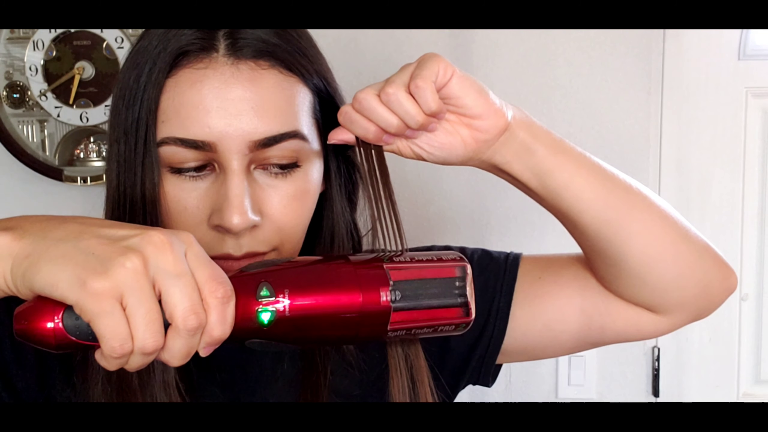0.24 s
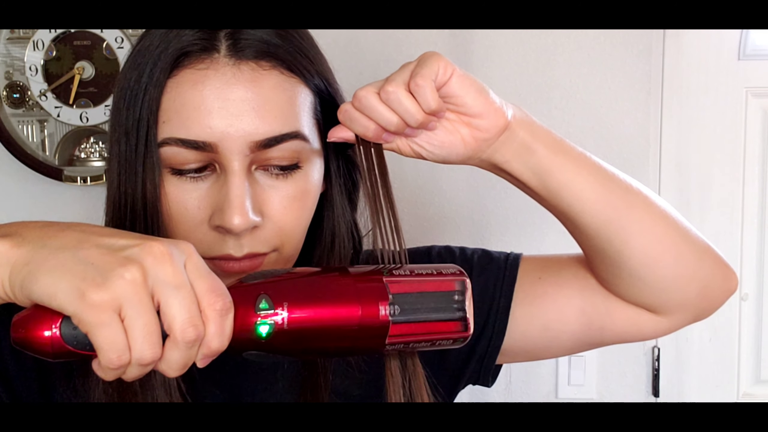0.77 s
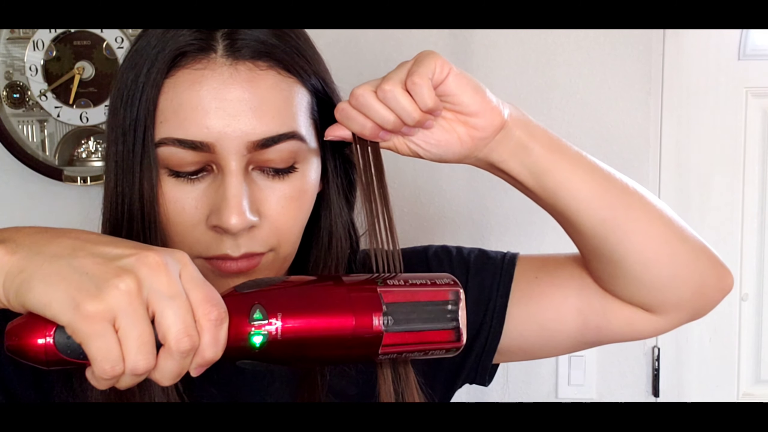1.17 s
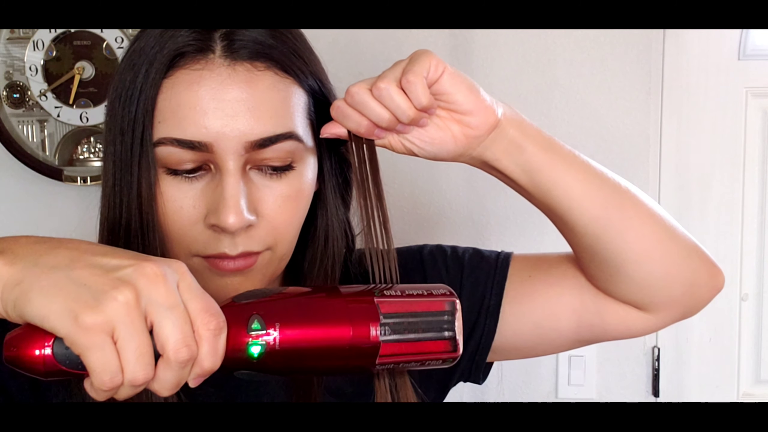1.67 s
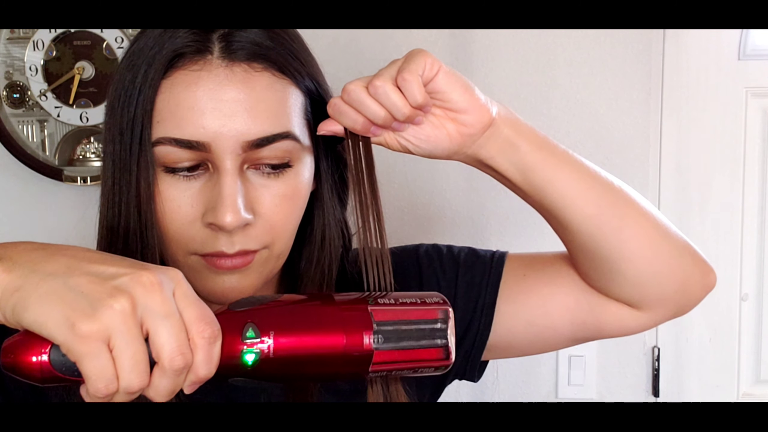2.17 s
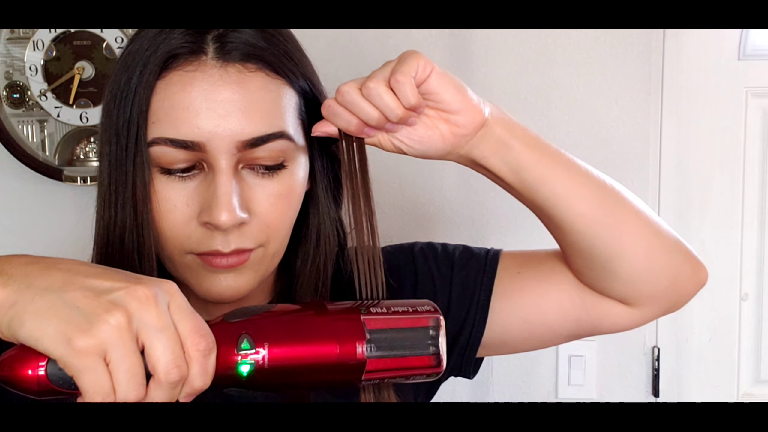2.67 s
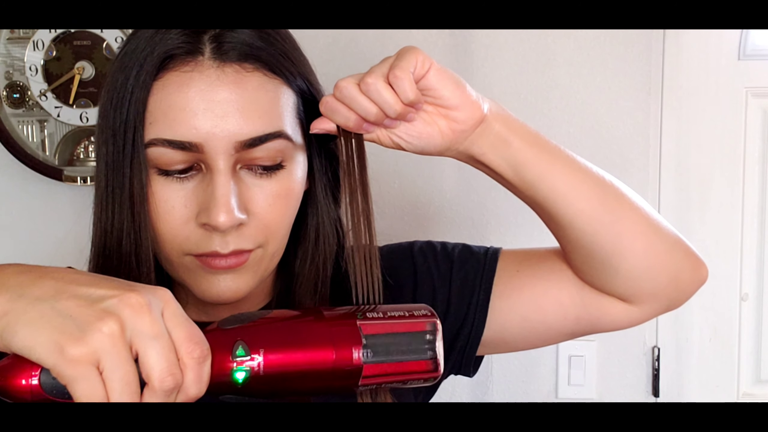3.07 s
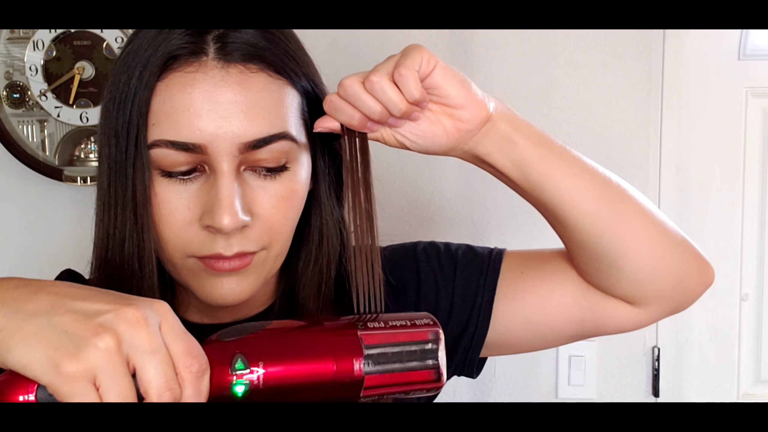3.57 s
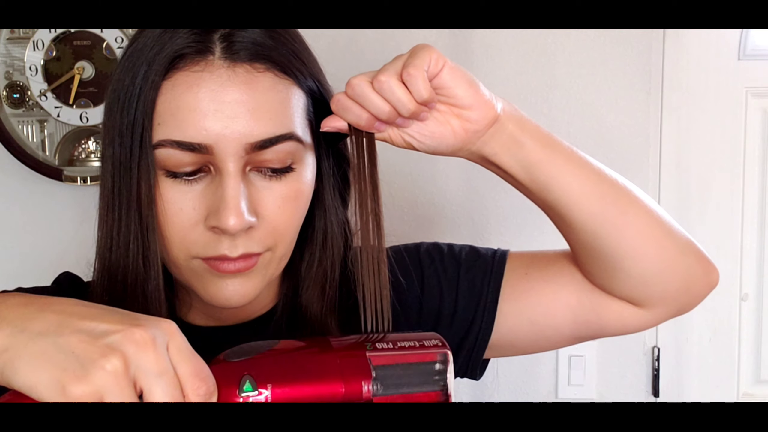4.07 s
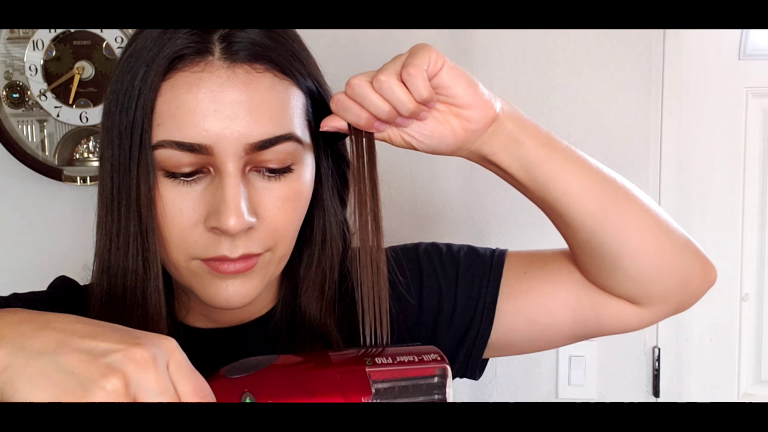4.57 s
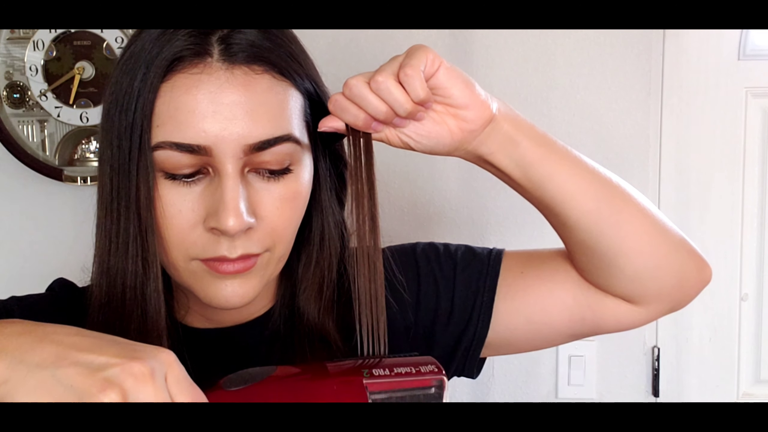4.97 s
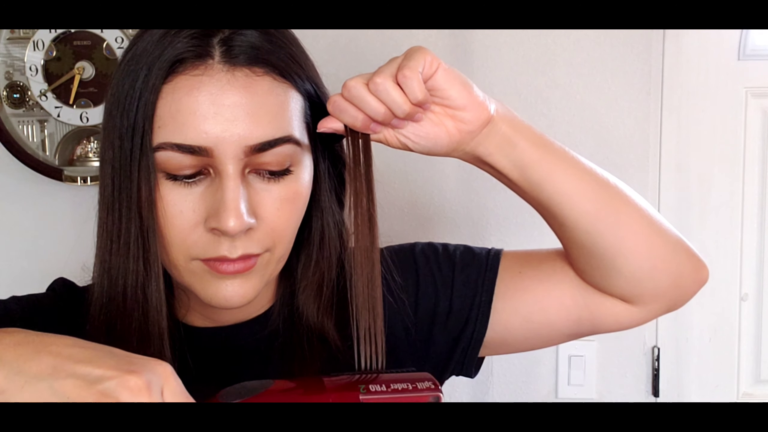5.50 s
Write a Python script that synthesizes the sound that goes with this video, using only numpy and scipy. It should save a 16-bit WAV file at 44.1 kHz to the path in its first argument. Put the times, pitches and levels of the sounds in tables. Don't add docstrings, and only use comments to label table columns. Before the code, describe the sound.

A handheld electric hair trimmer runs without a break, a buzzy, rattling whine with dry rubbing between rapid contacts. A tiny bright snip comes just after one second, then a cutter edge ticks more strongly within the buzz. The tone shifts as the tool is drawn down and turned. A cooling unit hums low underneath. Close stereo microphone, quiet small room with a short reverberation.

```python
import sys
import numpy as np
from scipy import signal
from scipy.fft import rfft, irfft, next_fast_len
from scipy.io import wavfile

SR = 44100
rng = np.random.default_rng(int(sys.argv[2]) if len(sys.argv) > 2 else 0)


def wav_out(sig):
    wavfile.write(sys.argv[1], SR, np.round(np.clip(np.atleast_2d(sig).T, -1, 1) * 32767).astype(np.int16))


def gain_from_db(level_db):
    decades = np.asarray(level_db, float) / 20
    return 10 ** decades


N = 253134
SIZE = next_fast_len(N + SR // 2)
HZ = np.arange(SIZE // 2 + 1) * SR / SIZE + 1e-3
SIDE = np.array([[.5], [-.5]])
MOTOR_TURNS_PER_DRUM_TURN = 3


def rms_one(x):
    return x / np.sqrt(np.mean(np.abs(x) ** 2) + 1e-20)


def in_time(rows):
    s, *columns = np.transpose(rows)
    return [np.interp(np.arange(N) / SR, s, c) for c in columns]


def pair(alike, length):
    mid, side = rfft(rng.standard_normal((2, length)), SIZE)
    alike = np.clip(alike, 0, 1)
    shared = np.sqrt(1 + alike) * mid
    different = np.sqrt(1 - alike) * side * [[1], [-1]]
    return (shared + different) / np.sqrt(2)


# (time [s], speed [turns/s])
MOTOR_SPEED = [(0.0, 67.40), (0.29, 67.36), (0.57, 67.442), (1.03, 67.099), (1.33, 67.329), (1.72, 67.009),
               (1.95, 67.04), (2.17, 66.963), (2.5, 67.336), (2.8, 67.132), (3.1, 67.243), (3.44, 67.402),
               (3.73, 67.241), (3.9, 67.269), (4.16, 67.198), (4.76, 67.429), (5.3, 67.329), (5.74, 67.15)]


def drum_turns():
    start = -.0102
    return start + np.cumsum(in_time(MOTOR_SPEED)[0]) / SR / MOTOR_TURNS_PER_DRUM_TURN


def blows(drum, places, db, jitter_s, uneven_db):
    turns = np.arange(-1, int(drum[-1]) + 1)
    places = (turns[:, None] + places).ravel()
    chance = rng.standard_normal((len(places), 2))
    samples = np.interp(places, drum, np.arange(N), -9, N + 9)
    at = np.round(samples + jitter_s * SR * chance[:, 0]).astype(int)
    inside = (at >= 0) & (at < N)
    db = np.tile(db, (len(turns), 1)) + uneven_db * chance[:, 1:]
    trains = np.zeros((db.shape[1], N))
    np.add.at(trains.T, at[inside], gain_from_db(db[inside]))
    return list(trains / np.sqrt(np.mean(trains ** 2, axis=1, keepdims=True)))


CONTACT_PLACES = [-.103, -.012, .2, .414, .504]
# (into shell [dB], handle [dB], cover [dB], blade [dB], guard [dB])
CONTACT_STRENGTHS = [
    (-40, -40, -20, -9, 0),
    (-1, 0, -2, -2, -5),
    (-40, -40, -9, -10, -30),
    (-40, -40, -11, -6, -18),
    (-.6, -14, -8, -8, -20),
]
# (into shell [dB], handle [dB], cover [dB], blade [dB], guard [dB])
RUNOUT = [
    (0, 0, 0, -1, 0),
    (0, -1.5, 0, 1, 0),
    (0, .5, -1, -8, -11),
]


def contact_blows(drum):
    motor_turns = np.arange(MOTOR_TURNS_PER_DRUM_TURN)[:, None]
    places = np.ravel(motor_turns + CONTACT_PLACES) / MOTOR_TURNS_PER_DRUM_TURN
    strengths = np.vstack([np.add(CONTACT_STRENGTHS, runout_db) for runout_db in RUNOUT])
    return blows(drum, places, strengths, jitter_s=.000007, uneven_db=0.32)


def edge_snaps(drum):
    place = .652
    return blows(drum, place, [[0]], jitter_s=.000006, uneven_db=.8)


# (time [s], pose [0 early, 1 midway, 2 late])
TURNING = [
    (0, 0),
    (1.2, .2),
    (2.6, 1),
    (3.9, 1.2),
    (4.7, 1.9),
    (5.74, 2),
]


def turned_pose():
    return in_time(TURNING)[0]


# (early [dB], midway [dB], late [dB])
GRIP = [
    (-28.5, -29.5, -31.5),
    (-33, -33, -32.5),
    (-24, -26.5, -24.5),
    (-26.5, -25, -27),
    (-42.5, -41.5, -40.5),
]
# (time [s], level [dB])
SNAP_LEVEL = [(0, -41), (1.0, -38), (2.0, -31.5), (3.0, -31), (5.74, -31.5)]


def part_levels(turned):
    return [np.interp(turned, [0, 1, 2], db) for db in GRIP] + in_time(SNAP_LEVEL)


# (rubbing against blows [dB], left-right of blows [dB], left-right of rubbing [dB])
PARTS = [
    (-12.5, 0, 3.5),
    (-7, 1, -7.5),
    (-4, 4, 2.0),
    (2, 3, 1),
    (-8, 12, 4.0),
    (-41, 3.5, -1),
]
RUB_ALIKE = [0.072, 0.2, 0.3, 0.078, 0.1, .3]
CHATTER = [0.083, .1, 0.037, 0.076, 1.8, .3]


def blows_and_rubbing(trains, levels):
    fade = np.exp(-1 / (.0011 * SR))
    drive = []
    for train, level_db, part, alike, swell in zip(trains, levels, PARTS, RUB_ALIKE, CHATTER):
        rub_db, blow_pan, rub_pan = part
        after = signal.lfilter([1], [1, -fade], train)
        rub = irfft(pair(alike, N), SIZE)[:, :N] * rms_one(1 + swell * rms_one(after))
        both = train * gain_from_db(blow_pan * SIDE) + rub * gain_from_db(rub_db + rub_pan * SIDE)
        drive.append(rfft(gain_from_db(level_db) * rms_one(both), SIZE))
    return drive


def resonances(modes, pose, steep):
    total = 0
    for k, (hz, width, *db) in enumerate(modes):
        off_pitch = 1j * (HZ / hz - hz / HZ) * hz
        one = 1 / (1 + off_pitch / width)
        wide = 1 / (1 + off_pitch / (steep * width))
        total = total + (-1) ** k * gain_from_db(db[pose]) * one * wide
    return rms_one(total)


def room():
    t60_s, tail_db, alike_hz = .25, -11.0, 1800
    t = np.arange(SR // 2) / SR
    tail = irfft(pair(1 / (1 + (HZ / alike_hz) ** 4), len(t)), SIZE)[:, :len(t)]
    tail = tail * gain_from_db(-60 * t / t60_s) * (t > .002)
    return 1 + gain_from_db(tail_db) * rms_one(rfft(tail, SIZE))


# (pitch [Hz], width [Hz], early [dB], midway [dB], late [dB])
SHELL = [(715, 35, -15.5, -19, -20.5), (845.5, 16.6, -2.5, -10, -12), (1038, 70, -1.5, -2.5, -7.5),
         (1071.4, 49, -3.5, -2, -8), (1166.9, 55, -0.5, -3.5, -11.5), (1326, 80, -12, -14, -23)]
HANDLE = [(1461, 284, 21.5, 6.3, -7.5), (1730, 460, 27, 8.5, -1), (2039, 39, 32.7, 13.3, -42)]
COVER = [(2292, 454, -5.5, -10, -8.5), (2565, 340, 1, -4.5, -0.5), (2730, 235, 1.5, 0.5, 8),
         (2796.7, 176, 2.5, -2, 8), (3015, 55, 0.5, -3.5, -14), (3200, 113, 1, -9.5, -1)]
BLADE = [(3407, 220, 1, 1, 5), (3744, 140, -18, -4, 1.5), (3987, 150, 6, 2.5, 7),
         (4220, 810, -1.5, -6.5, -1), (5290, 800, -8, -12, -6), (6550, 1800, -10.5, -17.5, -13.5),
         (8004, 400, -4.5, -9.5, -4.5)]
GUARD = [(8950, 320, 2, -6, -13), (10940, 660, 8, 7, 3), (12170, 460, -8, -1, -2),
         (13500, 900, -21, -14, -20), (14700, 830, -11, -9, -12)]
COMB = [(2440, 250, -22, -18, -7), (3880, 330, 0, 0, -1), (4220, 330, 0, 0, 0)]
# (early [ms], midway [ms], late [ms])
LAGS = [(-.02, -.03, -.06), (-.05, -.04, -.04), (-.12, -.1, -.08), (.08, .05, -.03), (-.9, -.7, -.5),
        (.06, .02, -.02)]
EARLY_S = [-.0047, .0015, .0018, .0011, -.0002, .0007]


def trimmer():
    drum, turned = drum_turns(), turned_pose()
    trains = contact_blows(drum) + edge_snaps(drum)
    drive = blows_and_rubbing(trains, part_levels(turned))
    parts = (SHELL, HANDLE, COVER, BLADE, GUARD, COMB)
    out, space = np.zeros((2, N)), rms_one(room())
    for pose in range(3):
        heard = 0
        for spectrum, modes, lag_ms, early_s in zip(drive, parts, LAGS, EARLY_S):
            delay_s = SIDE * lag_ms[pose] / 1000 - early_s
            lag = np.exp(-2j * np.pi * HZ * delay_s)
            heard = heard + spectrum * resonances(modes, pose, steep=2.72) * lag
        nearness = np.clip(1 - abs(turned - pose), 0, 1)
        out += nearness * irfft(heard * space, SIZE)[:, :N] * 0.85
    return out


def snip():
    start_s, level_db, decay_s = 1.22, -27.0, .002
    t = np.arange(N) / SR - start_s
    burst = rng.standard_normal((2, N)) * np.exp(-np.clip(t, 0, 1) / decay_s) * (t > 0)
    treble = signal.butter(2, 6000, "high", fs=SR, output="sos")
    return gain_from_db(level_db) * signal.sosfilt(treble, burst)


# (time [s], level [dB])
HUM_LEVEL = [(0, -23.5), (1.0, -24.5), (1.5, -23.5), (3.1, -23.5), (4.1, -23.5), (4.5, -24.5),
             (5.74, -23.5)]
# (multiple of the hum [ratio], level against the hum [dB])
OVERTONES = [(1.999, -24.5), (3, -28.0), (3.7, -36), (4.9, -33)]


def cooler_hum():
    hum_hz, mains_hz, mains_db = 58.76, 120.05, -50
    turn = 2 * np.pi * np.arange(N) / SR
    hum = np.sin(hum_hz * turn)
    for multiple, under_db in OVERTONES:
        hum = hum + gain_from_db(under_db) * np.sin(multiple * hum_hz * turn)
    mains = -gain_from_db(mains_db) * np.sin(mains_hz * turn)
    left_right = gain_from_db([[.35], [-.35]])
    return np.sqrt(2) * (gain_from_db(in_time(HUM_LEVEL)[0]) * hum + mains) * left_right


def at_hz(points):
    hz, values = np.array(points).T
    return np.interp(np.log(HZ), np.log(hz), values)


# (frequency [Hz], level [dB per Hz])
RUMBLE = [(20, -7), (42, -4.5), (90, -2), (150, -11.5), (280, -12.5), (450, -17.5), (800, -16),
          (2000, -20.5)]
# (frequency [Hz], likeness [0-1])
RUMBLE_ALIKE = [(30, .6), (60, 0.28), (130, 0.98), (290, 0.8), (640, 0.33), (2000, 0.061)]


def air_rumble():
    level_db = -34
    air = irfft(pair(at_hz(RUMBLE_ALIKE), SIZE) * gain_from_db(at_hz(RUMBLE)), SIZE)[:, :N]
    return gain_from_db(level_db) * rms_one(air)


def scene():
    return trimmer() + snip() + cooler_hum() + air_rumble()


def band_limit(x):
    return signal.sosfilt(signal.butter(12, 15500, fs=SR, output="sos"), x)


def record(dry):
    treble_fade = signal.butter(10, 15100, fs=SR, output="sos")
    mix = signal.sosfilt(treble_fade, dry)
    return band_limit(mix)


dry = scene()
out = record(dry)
wav_out(out)
```